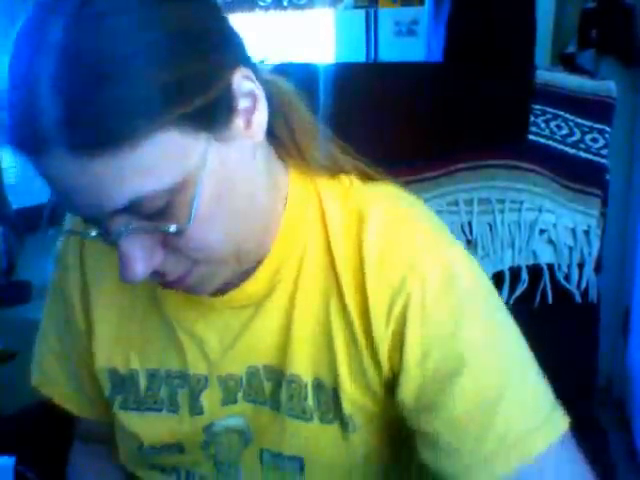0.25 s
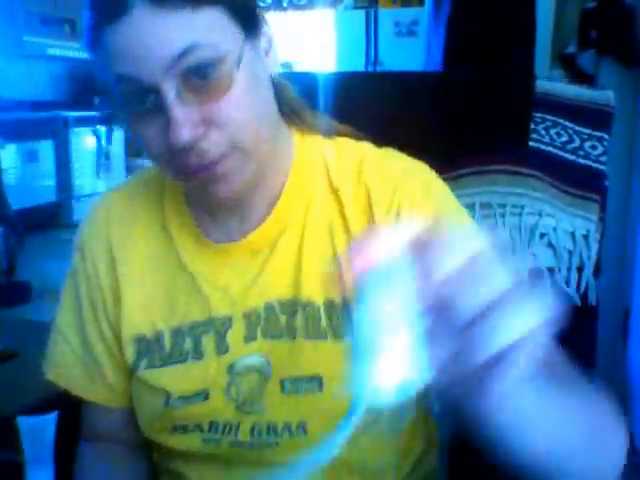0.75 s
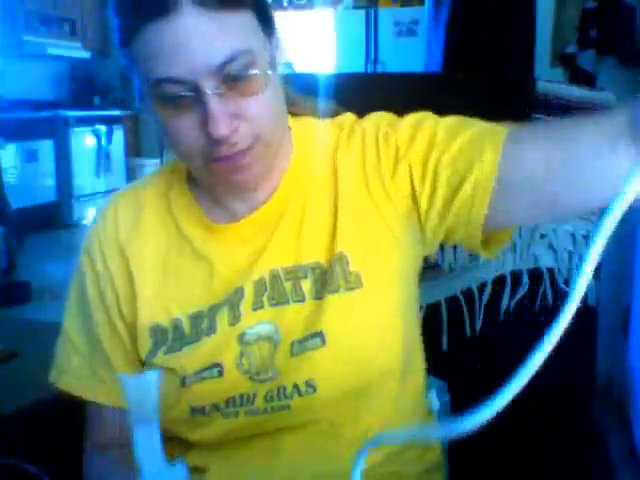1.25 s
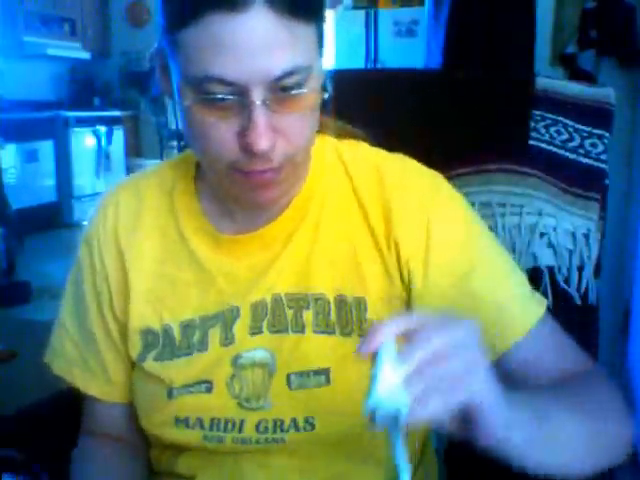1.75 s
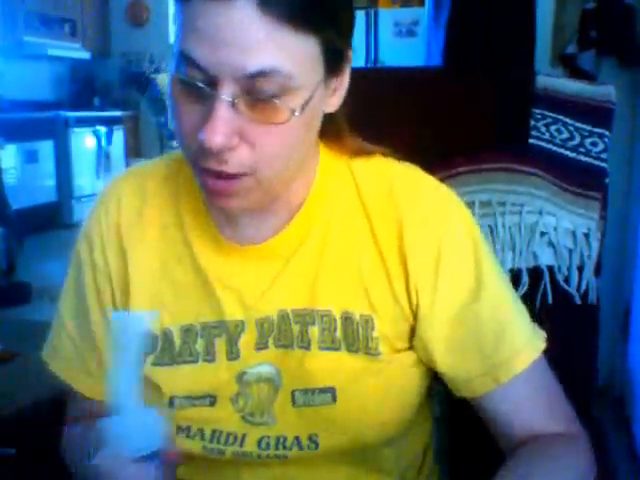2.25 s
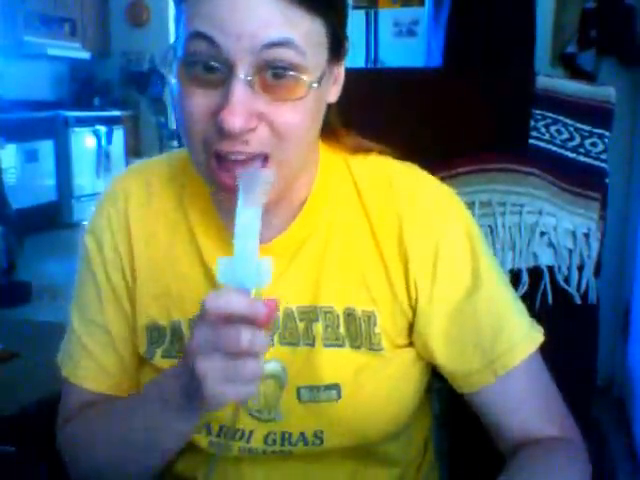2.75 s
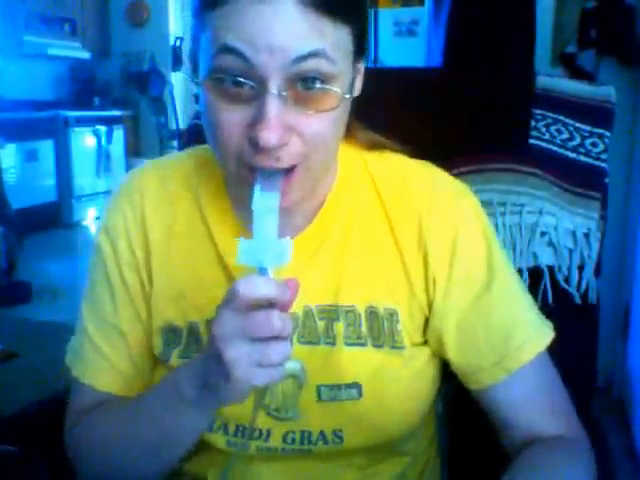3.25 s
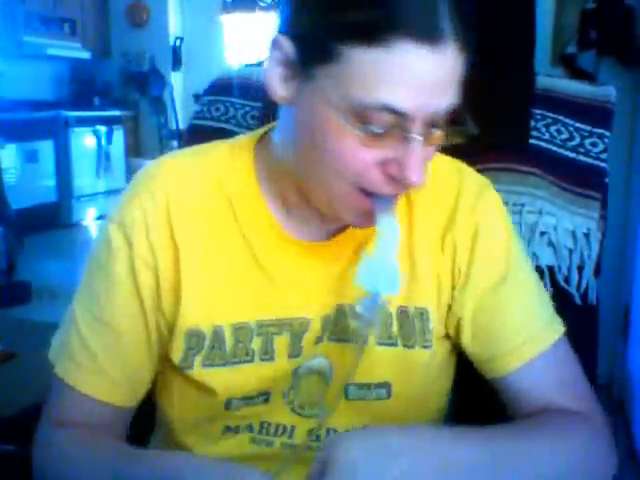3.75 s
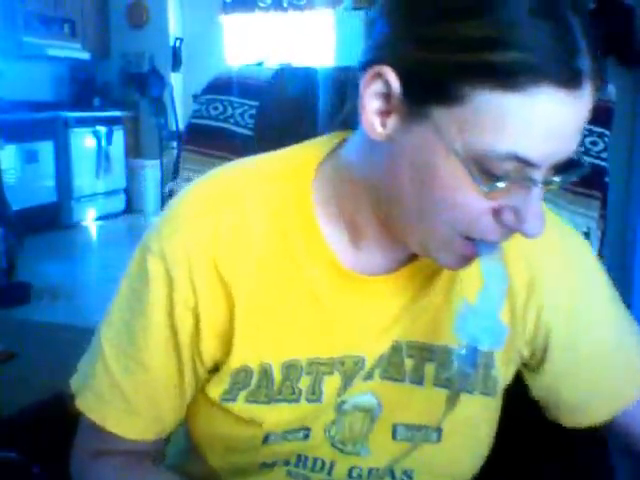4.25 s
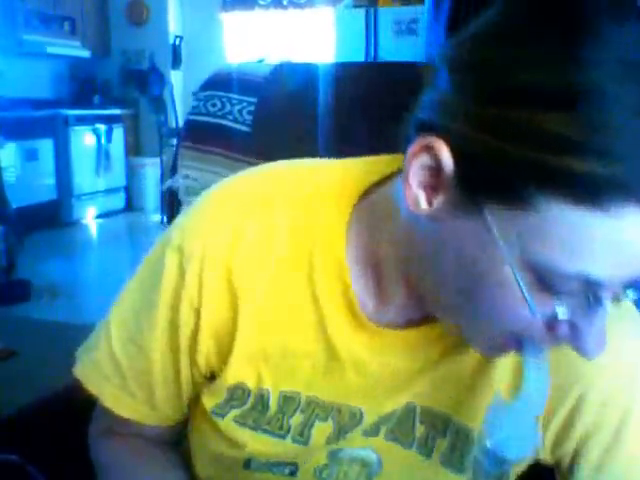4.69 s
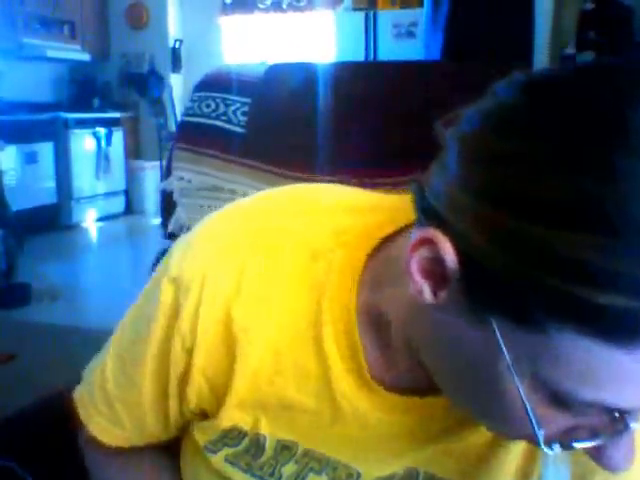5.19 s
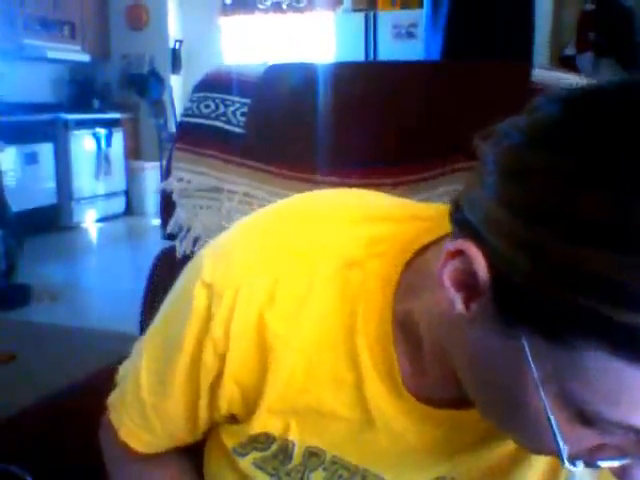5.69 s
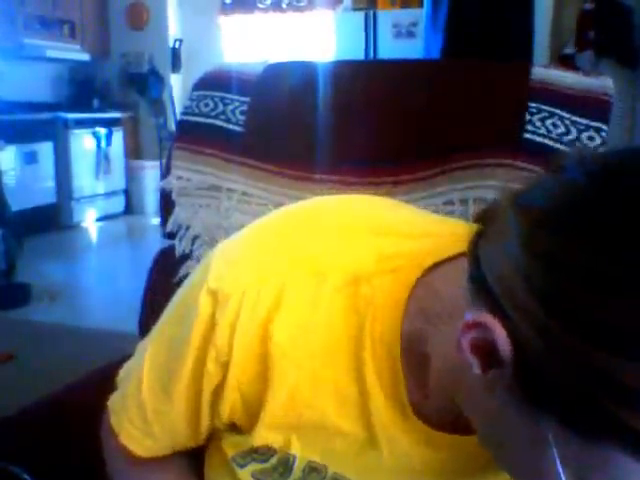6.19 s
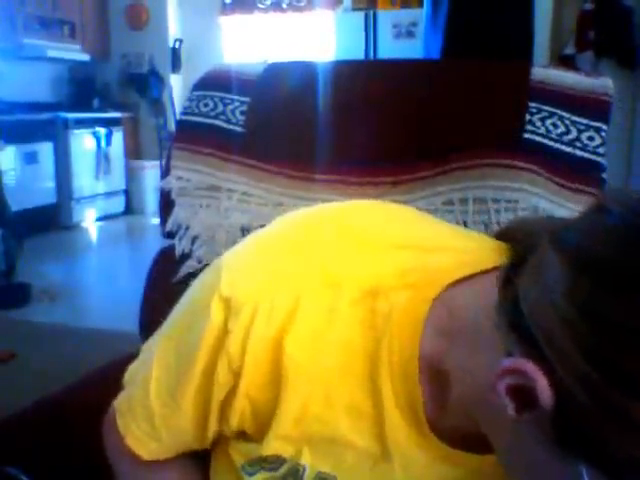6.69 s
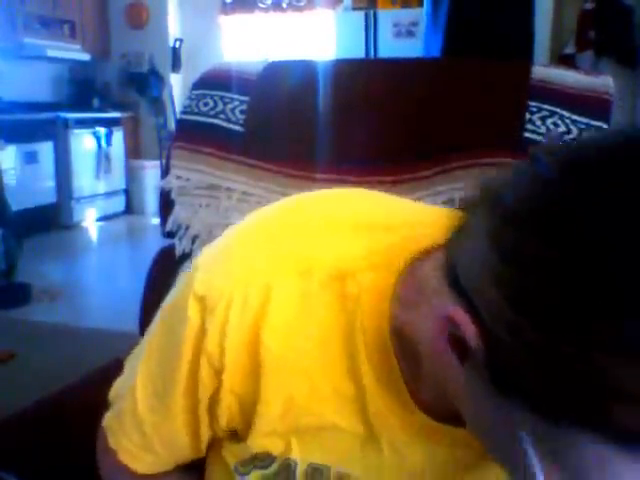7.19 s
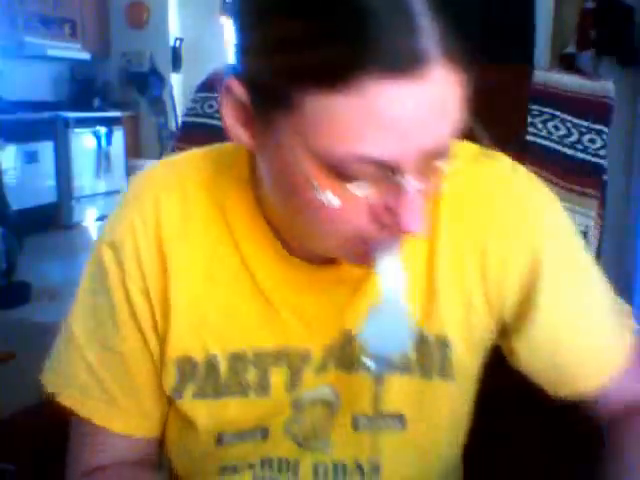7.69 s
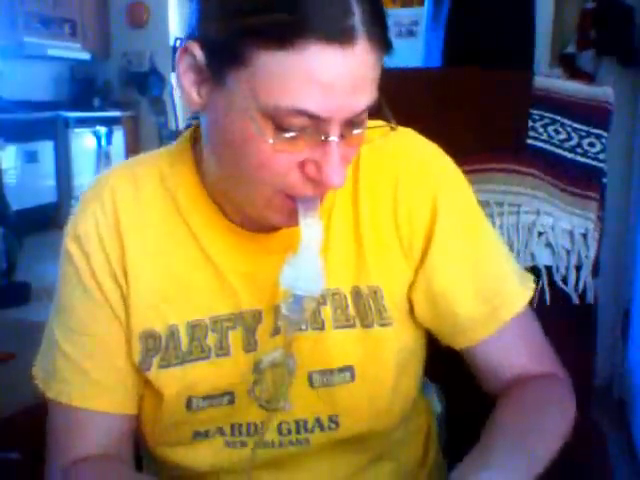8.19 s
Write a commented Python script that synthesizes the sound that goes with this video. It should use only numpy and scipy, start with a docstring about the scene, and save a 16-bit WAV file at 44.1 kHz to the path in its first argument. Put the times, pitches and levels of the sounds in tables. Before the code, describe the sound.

Close indoor handling of a plastic kit: sharp hollow rattles at first, then sparse light taps and low thumps above a constant low hum.

```python
"""Hard plastic parts clatter on the hollow case of a nebulizer kit as the tubing is pulled free.
Each contact is a few noise bursts plus the decaying rings of the case and of a loose part.
Fainter ticks, mouthpiece clicks, skidding scrapes and low bumps follow, as a power plug is fumbled.
A fan, made of a hum, filtered noise and thin tones, runs underneath and swells when the noise gate opens.
All the handling sounds in a small room, close to a cheap computer microphone that cuts the high treble."""
import sys
import numpy as np
from scipy import signal
from scipy.fft import rfft, irfft
from scipy.io import wavfile
from scipy.ndimage import uniform_filter1d

SR = 44100
rng = np.random.default_rng(int(sys.argv[2]) if len(sys.argv) > 2 else 0)


def int16_out(signal):
    """Quantize to a 16-bit WAV file."""
    q = np.round(np.clip(np.atleast_2d(signal).T, -1, 1) * 32767)
    wavfile.write(sys.argv[1], SR, q.astype(np.int16))


N = 372204  # length in samples

# Plastic clattering on the case. Each row: start in seconds, relative level in dB, bright top in dB,
# hollow low part in dB, ring of the loose part in Hz, relative level of that ring in dB.
CLATTER_HITS = [(.072, -8.5, -6.5, -5, 2290, -7.5), (0.0756, -12, -16.5, -1, 580, -3.5),
                (0.0813, -18.5, -14, 0, 2310, -7), (.088, -23, -16, 1.5, 1900, -6),
                (0.1026, -17.5, -7, 1, 2290, -1.5), (.1255, -25, -7, -1, 950, 1),
                (0.1731, -32, -15, 2, 2000, -2.5), (.2052, -26, -21.5, 6.5, 800, -9),
                (.2585, -15.5, -3, -1.5, 6150, 4), (0.2627, -24, -18, 1.5, 930, -2.5),
                (0.2985, -25.5, -15.5, 0.5, 2100, -6.5), (.6315, -9.5, -9, -2.5, 2450, -6.5),
                (.642, -13.5, -8, -5.5, 1550, -6), (.6505, -8.5, -3.5, -4.5, 5900, 2.5),
                (.6543, -15, -18, 0.5, 936, -4), (0.665, -24.5, -6, -2, 5730, -7.5),
                (.6829, -22.5, -7.5, -3, 2390, -6), (.7387, -23, -11, -2.5, 2360, -5.5),
                (0.777, -20.5, -9.5, -5, 2840, -5.5), (.7847, -22.5, -4, -2, 5285, -7.5),
                (.7915, -26.5, -9, -4, 2500, -8), (0.8007, -19.5, -7.5, -1.5, 1570, -8.5),
                (.836, -29, -15, -3.5, 2439, -6.5), (0.8812, -8.5, -5, -4.5, 2050, -9),
                (0.9035, -24, -7.5, -5, 2930, -3), (.909, -5, -7.5, -5.5, 5965, -0.5),
                (0.9116, -12, -10.5, -2, 2961, 2), (.9184, -17.5, -10, -1.5, 970, -2.5),
                (1.0035, -27, -16.5, -3, 520, -11.5), (1.0485, -16, -8, -11, 1810, -10),
                (1.1164, -29, -37.5, 1, 1890, -5.5), (1.138, -30, -29.5, -8, 1954, -7),
                (1.1838, -28, -30, 0.5, 2460, -3)]
# Ringing modes of the case and its parts. Each row: pitch in Hz, relative level in dB, 60 dB decay in seconds.
CASE_MODES = [(267, -15.5, 0.15), (361, -12, 0.16), (488.59, -8.5, 0.27), (537, -9.5, .2), (618.8, -9, 0.2),
              (716.7, -19, .22), (823.3, -18, 0.36), (921.2, -14, 0.36), (998.4, -16, 0.3),
              (1251, -20, 0.33), (1337.4, -20, .22), (1436.5, -19, 0.2), (1588, -14, 0.13),
              (1894, -15, .14), (1985, -15.5, .14), (2133, -15.5, 0.1), (2397, -14.5, .12),
              (2284, -13, 0.16), (2560, -17, 0.13), (2923.7, -13.5, 0.13), (3463, -18.5, .14)]
# Colour of a plastic crack. Each row: frequency in Hz, relative density in dB per Hz.
CRACK_COLOUR = [(120, -25), (260, -3), (370, 4.5), (530, 9), (740, -1), (950, -0.5), (1170, -8.5),
                (1550, -3), (1720, -5.5), (2270, -1.5), (2600, -7), (3200, -6), (3750, -16), (4400, -7.5),
                (5200, -10), (6000, -7.5), (7200, -16), (8600, -35)]
# Light ticks of tubing, mouthpiece and plug. Each row: start in seconds, relative level in dB, low part in dB,
# bright top in dB, lower ring in Hz, upper ring in Hz, relative level of the rings in dB.
LIGHT_TICKS = [(1.407, -31, 1.5, -4, 582, 1936, 1), (1.484, -37.5, -10.5, 1, 1283, 2380, -23),
               (1.805, -33, -5, -1.5, 1966, 2747, -2), (3.158, -54, -7, 2.5, 1543, 2108, 1),
               (3.253, -53, -9.5, -6, 2245, 6010, -10), (4.790, -35.5, 5, -28.5, 784.8, 1417, 1),
               (4.842, -50.5, 12, -29.5, 1039, 1280, 6.5), (4.885, -43, 12.5, -40, 420, 1114, 1.5),
               (4.897, -46.5, 7.5, -29, 462, 1400, 2), (4.936, -38, 0.5, -8, 1117, 1413, 0),
               (4.941, -43, 3, -19, 1453, 1853, 4.5), (5.3007, -36.5, 8.5, -15, 1307, 3370, -2),
               (5.313, -38, 2, -40, 832, 1583, -0.5), (6.0194, -37, 4, -26.5, 424, 1098, 4.5),
               (6.030, -48.5, 6, -33, 496, 1132, 6.5), (7.01, -34, 0, -34, 748.7, 1644, -3.5),
               (7.284, -34.5, 7.5, -12.5, 1262, 2575, 0.5), (7.288, -31.5, 6.5, -24.5, 516, 841, 2),
               (7.298, -41.5, 11, -45.5, 447, 990, -8.5), (7.359, -38, -4.5, -28, 920, 1145, 3.5),
               (7.384, -40.5, 8, -34, 463, 1337, 2), (7.404, -46.5, -10, -37.5, 1110, 1342, 1),
               (7.484, -32, 1, -18, 898.4, 1964, -5), (7.580, -40.5, 11.5, -40, 399, 1205, -7.5),
               (7.604, -36.5, 9, -41, 778.6, 1737, 2), (7.7093, -43, 4, -3.5, 854, 909, 14),
               (7.724, -45.5, 6.5, -33.5, 640, 951, 4), (7.779, -44, -2, -38, 1160, 1420, 6),
               (7.783, -48.5, 3, -36.5, 364, 891, 14), (8.159, -50, -17, -0.5, 2320, 3780, -1.5)]
# Colour of a tick. Each row: frequency in Hz, relative density in dB per Hz.
TICK_COLOUR = [(100, 3), (300, 10), (700, 3.5), (1400, 2), (2200, 2.5), (3200, -1.5), (4200, -12.5),
               (6300, -13.5), (8500, -25.5)]
# Soft bumps of case and furniture. Each row: start in seconds, level in dB before BUMP_DB, pitch in Hz.
SOFT_BUMPS = [(0.065, -10.5, 443), (0.072, -14.5, 317.8), (0.0733, -6, 497.5), (0.207, -23.5, 351),
              (0.262, -21.5, 321.2), (3.661, -59.5, 110), (4.797, -23, 189.7), (4.822, -32.5, 64.4),
              (4.949, -26, 79.2), (5.306, -36.5, 109.8), (6.02, -37.5, 185.4), (6.029, -27, 88),
              (7.285, -30, 476.3), (7.298, -38, 288), (7.314, -27.5, 276), (7.401, -30.5, 82.5),
              (7.606, -26, 90.4), (7.783, -28.5, 298.7), (7.805, -29, 75.7)]
# Colour of the fan's rushing air. Each row: frequency in Hz, relative density in dB per Hz.
FAN_AIR = [(20, 1), (50, 6), (90, 1), (130, 1), (180, -5.5), (235, -2.5), (300, -5), (400, -7), (600, -9.5),
           (1000, -18), (1500, -17.5), (2500, -27), (3800, -31), (6500, -38), (8500, -52)]
# Fan tones and a thin electronic whine. Each row: centre pitch in Hz, mean rms level in dB before the gate.
FAN_TONES = [(120, -63.5), (156, -70.5), (210.6, -61), (251, -63), (526, -69.5), (553.5, -72.5), (681, -73),
             (899, -75), (1021.5, -70.5), (1064, -77), (1362, -74.5), (1404, -79), (7970, -99)]
# Decay of the room's tail. Each row: frequency in Hz, 60 dB decay in seconds.
ROOM_T60 = [(200, 0.74), (900, .46), (2500, 0.32), (7000, 0.11935)]
# Colour the furnished room gives back. Each row: frequency in Hz, gain in dB.
ROOM_COLOUR = [(200, -7.5), (900, -1), (2500, -9), (6000, -9.5)]
# Noise gate. Each row: level at the microphone in dB, gain in dB.
GATE_CURVE = [(-37, -11), (-33.5, -4), (-19.5, -1.5)]
# Softer touches die away more slowly; their rise is slightly quicker. Each row: bright top in dB,
# basic rise in seconds, basic 60 dB decay in seconds.
CONTACT_TIMES = [(-38.5, 0.00081, 0.0714), (-17.5, 0.001124, 0.027)]
# Deeper bumps swing longer. Each row: pitch in Hz, 60 dB decay in seconds.
BUMP_T60 = [(65, 0.052), (110, 0.052), (400, 0.028)]
# Pulls sliding tubing and cord over the case. Each row: start in seconds, length in seconds,
# relative level in dB, bright top in dB.
PULLS = [(0.048, 0.29, -44.5, -25), (0.664, 0.0675, -34, -1), (0.768, 0.086, -41, -18.5),
         (0.903, 0.0865, -37, -6), (0.999, 0.0916, -40.5, -36), (1.375, 0.0233, -45.5, -19.5)]
# How far up the body of a contact reaches. Each row: bright top in dB, basic cutoff in Hz.
CONTACT_REACH = [(-41.5, 1850), (-18.5, 1300), (-9, 12000)]
# Mouthpiece clicks against the cup. Each row: start in seconds, relative level in dB, lower favoured pitch
# in Hz, upper favoured pitch in Hz, share of the ring time left by the grip, low edge of the snap in Hz.
MOUTHPIECE_CLICKS = [(3.019, -42, 1387, 3680, 0.885, 396.3), (3.6522, -42, 1830, 3135, 0.93, 291.9),
                     (8.083, -48.5, 1488, 2520, 0.56, 2830)]
# Mouthpiece modes. Each row: pitch in Hz, relative level in dB, 60 dB decay in seconds before the grip.
MOUTHPIECE_MODES = [(1050, -5, 0.066), (1417.4, 1.5, 0.053), (1827.3, 7.5, 0.0211), (2194, 9.5, 0.035),
                    (2500, -16.5, 0.0205), (3007, 2.5, 0.0263), (3438, -7, 0.0465), (3895, 2, 0.0216),
                    (4380, -4, 0.0263), (5680, -28.5, 0.019), (6726, -11.5, 0.0214)]
# Short scrapes of an edge, the cord or the plug. Each row: start in seconds, length in seconds,
# relative level in dB, pitch in Hz.
SHORT_SCRAPES = [(.058, .012, -41.5, 2300), (0.148, 0.013, -44.5, 2303), (0.848, .012, -47, 3000),
                 (0.934, .028, -45, 4419), (1.002, 0.019, -49, 5994), (1.035, 0.02, -41, 4915),
                 (1.076, 0.014, -50.5, 3077), (3.02, .012, -44.5, 1398), (3.125, .012, -58.5, 1627),
                 (4.238, 0.26, -69.5, 2147), (6.658, 0.0646, -71, 3000), (6.948, 0.076, -66.5, 2350),
                 (7.106, 0.0077, -64.5, 2590), (7.344, .05, -54, 1270), (7.368, .028, -57, 2002),
                 (7.404, .028, -60, 1795), (7.591, 0.024, -51, 2037), (8.112, .028, -64, 1992),
                 (8.159, 0.031, -59, 2390), (8.161, 0.057, -68.5, 3600)]
# Larger loose parts ring lower and mostly longer. Each row: pitch in Hz, 60 dB decay in seconds.
PART_T60 = [(550, 0.065), (950, 0.099), (2300, 0.03), (6000, 0.012)]

FAN_DB, HUM_HZ, HUM_DB = -50.5, 89.615, -39  # air rms level; mean pitch and rms level of the hum
PULL_ATTACK_S, PULL_RELEASE_S = 0.02, 0.09954  # time to get moving; 60 dB decay once let go
BUMP_DB = 4  # how well the furniture carries bumps to the microphone
CUTOFF_HZ = 8600  # top of the microphone's range


def from_db(db):
    """Decibels to gain."""
    return 10 ** (np.asarray(db) / 20)


def rms_one(x):
    """Scale to rms 1."""
    return x / np.sqrt(np.mean(x ** 2) + 1e-20)


def unit_energy(x):
    """Scale so that the squares sum to 1."""
    return x / np.sqrt(np.sum(x ** 2) + 1e-20)


def at_hz(points, hz):
    """Read a table on a log-frequency axis."""
    f, value = np.transpose(points)
    return np.interp(np.log(np.maximum(hz, 1)), np.log(f), value)


def read(points, x):
    """Read every column of a table at a value of its first one."""
    axis, *columns = np.transpose(points)
    return [np.interp(x, axis, column) for column in columns]


def add(track, start, sound):
    """Mix a sound into a track at a time in seconds."""
    i = max(round(start * SR), 0)
    track[i:i + len(sound)] += sound[:N - i]


def coloured(x, spectrum, size=4096):
    """Causal (minimum-phase) filter with a given spectrum, built by folding the cepstrum."""
    cepstrum = irfft(np.log(from_db(at_hz(spectrum, np.fft.rfftfreq(size, 1 / SR)))))
    cepstrum[1:size // 2] *= 2
    cepstrum[size // 2 + 1:] = 0
    response = irfft(np.exp(rfft(cepstrum)))
    return signal.fftconvolve(x, response)[:len(x)]


def evened(x):
    """Level out the broad humps of a noise, keeping its fine ripple."""
    hz = np.fft.rfftfreq(len(x), 1 / SR)
    energy = np.cumsum(np.abs(rfft(x)) ** 2)
    edges = np.geomspace(80, 12000, 26)
    density = np.diff(np.interp(edges, hz, energy)) / np.diff(edges)
    centres = np.sqrt(edges[1:] * edges[:-1])
    return coloured(x, np.transpose([centres, -10 * np.log10(density + 1e-20)]))


def band(x, low_hz, high_hz):
    """Butterworth band-pass."""
    return signal.sosfilt(signal.butter(2, [low_hz, high_hz], "band", fs=SR, output="sos"), x)


def dulled(x, hz):
    """A yielding contact loses its treble: a low-pass above some pitch."""
    return signal.sosfilt(signal.butter(4, min(hz, .45 * SR), fs=SR, output="sos"), x)


def resonance(x, hz, width_hz):
    """Two-pole resonance with gain 1 on top."""
    r = np.exp(-np.pi * width_hz / SR)
    zeros = np.array([1, 0, -1]) * (1 - r * r) / 2
    return signal.lfilter(zeros, [1, -2 * r * np.cos(2 * np.pi * hz / SR), r * r], x)


def fade(t, t60):
    """Exponential decay by 60 dB in t60 seconds."""
    return np.exp(-np.log(1000) * t / t60)


def swell(t, rise_s):
    """A contact takes a moment to build up: an exponential approach to 1."""
    return 1 - np.exp(-t / max(rise_s, 1e-5))


def ring(t, hz, t60):
    """A struck mode: a sine dying away exponentially."""
    return np.sin(2 * np.pi * hz * t) * fade(t, t60)


def drift(rate):
    """Random wander along straight lines between points of spread 1, at a rate of points per second."""
    knots = rng.standard_normal(int(rate * N / SR) + 2)
    return np.interp(np.arange(N) * rate / SR, np.arange(len(knots)), knots)


def burst(colour, low_hz, high_hz, t60, rise_s=.0001, size=4096):
    """Decaying noise for many crowded, damped modes; energy of rms 1 over a hundredth of a second."""
    t = np.arange(size) / SR
    swarm = evened(rng.choice([-1, 1], size) * fade(t, t60) * swell(t, rise_s))
    return unit_energy(band(coloured(swarm, colour), low_hz, high_hz)) * np.sqrt(SR / 100)


def slip_clicks(per_s, size_db, catch_db, catch_rate):
    """Friction catches and lets go: random clicks of either sign whose sizes drift in clumps."""
    size = size_db * np.minimum(rng.exponential(1, N), 4) + catch_db * drift(catch_rate)
    signs = rng.choice([-1, 1], N)
    return from_db(size) * signs * (rng.random(N) < per_s / SR)


def wavering_tone(hz, waver_hz, rate):
    """A sine of rms 1 whose pitch wanders."""
    return np.sqrt(2) * np.sin(2 * np.pi * np.cumsum(hz + waver_hz * drift(rate)) / SR)


def fan(waver_hz=0.1, waver_db=0.41, flutter_db=2, tone_waver_hz=0.94):
    """A nearly pure hum at the turning rate, over rushing air with a few narrow tones."""
    hum = from_db(HUM_DB + waver_db * drift(2.1)) * wavering_tone(HUM_HZ, waver_hz, 16.0)
    air = from_db(FAN_DB) * rms_one(coloured(rng.standard_normal(N), FAN_AIR))
    tones = sum(from_db(db + flutter_db * drift(4)) * wavering_tone(hz, tone_waver_hz, 2.6)
                for hz, db in FAN_TONES)
    return hum + air + tones


def slide(per_s=800, size_db=2.5, catch_db=3.0, catch_rate=110, knee_hz=2800, case_db=-12):
    """Sliding tubing slips in clumps of tiny clicks that ring the case; some pulls scrape brighter."""
    clicks = slip_clicks(per_s, size_db, catch_db, catch_rate)
    slips = rms_one(coloured(clicks, CRACK_COLOUR))
    # a mode's bandwidth follows from its decay time
    case = rms_one(sum(resonance(clicks, hz, np.log(1000) / (np.pi * t60)) * from_db(db)
                       for hz, db, t60 in CASE_MODES))
    dull = band(slips, 340, knee_hz) + from_db(case_db) * case
    bright = band(slips, knee_hz, 7700)
    out, t = np.zeros(N), np.arange(N) / SR
    for start, length, db, bright_db in PULLS:
        attack = np.clip((t - start) / PULL_ATTACK_S, 0, 1)
        motion = attack * fade(np.maximum(t - start - length, 0), PULL_RELEASE_S)
        out += from_db(db) * motion * (dull + from_db(bright_db) * bright)
    return out


def scrapes(per_s=1700, size_db=2.0, catch_db=3, catch_rate=170, breadth=1.1, ring_width_hz=100,
            ring_db=0, rise_s=.003, release_t60=.04):
    """An edge skids in uneven little slips, each ringing it briefly around one pitch."""
    out, t = np.zeros(N), np.arange(SR // 3) / SR
    clicks = slip_clicks(per_s, size_db, catch_db, catch_rate)
    for start, length, db, hz in SHORT_SCRAPES:
        motion = swell(t, rise_s) * fade(np.maximum(t - length, 0), release_t60)
        slips = np.roll(clicks, -round(start * SR))[:len(t)] * motion + 1e-18
        rub = unit_energy(band(slips, hz / breadth, hz * breadth))
        edge_ring = unit_energy(dulled(resonance(slips, hz, ring_width_hz), hz * breadth))
        skid = unit_energy(rub + from_db(ring_db) * edge_ring)
        # longer scrapes carry more energy
        add(out, start, from_db(db) * np.sqrt(length * SR) * skid)
    return out


def bumps(rise_s=0.002755, sway_db=-15, sway_hz=50, sway_t60=0.55, heavy_hz=120):
    """Heavy, soft contacts swing for a few cycles; the deepest leave the furniture swaying."""
    out, t = np.zeros(N), np.arange(SR // 3) / SR
    for start, db, hz in SOFT_BUMPS:
        swing = ring(t, hz, at_hz(BUMP_T60, hz))
        sway = from_db(sway_db) * ring(t, sway_hz * rng.uniform(.8, 1.6015), sway_t60)
        bump = swing + sway * (hz < heavy_hz)
        add(out, start, from_db(db + BUMP_DB) * bump * swell(t, rise_s))
    return out


def clatter(low_db=-10.0, mid_db=-9.5, top_db=-9, case_db=-7, low_t60=0.033, mid_t60=0.024, top_t60=.015,
            spread_db=2, rise_s=.0004):
    """Each contact cracks, rings the loose part briefly and excites every case mode with a new strength."""
    out, t = np.zeros(N), np.arange(SR // 2) / SR
    hz, mode_db, t60 = np.transpose(CASE_MODES)
    case_rings = ring(t, hz[:, None], t60[:, None])
    signs = (-1) ** np.arange(len(hz))
    for start, db, bright_db, hollow_db, part_hz, part_db in CLATTER_HITS:
        reach_hz, = read(CONTACT_REACH, bright_db)
        low = burst(CRACK_COLOUR, 370, 1400, low_t60, 2 * rise_s)
        body = dulled(burst(CRACK_COLOUR, 1150, 4500, mid_t60, rise_s), 1.263 * reach_hz)
        top = burst(CRACK_COLOUR, 3800, 8100, top_t60, rise_s)
        part = ring(t, part_hz, at_hz(PART_T60, part_hz)) * swell(t, rise_s)
        add(out, start, from_db(db + hollow_db + low_db) * low)
        add(out, start, from_db(db + mid_db) * body)
        add(out, start, from_db(db + bright_db + top_db) * top)
        add(out, start, from_db(db + part_db) * part)
        # the hollow level tilts only the lower case modes
        tilt_db = at_hz([(800, hollow_db), (1400, 0.0008)], hz)
        strength = from_db(db + case_db + mode_db + tilt_db + spread_db * rng.standard_normal(len(hz)))
        add(out, start, strength * signs @ case_rings / 2)
    # parts this small radiate no bass
    return signal.sosfilt(signal.butter(2, 160, "high", fs=SR, output="sos"), out)


def ticks(low_db=-9, mid_db=-7, top_db=-6, lower_ring_db=2, upper_ring_db=0, ring_t60=0.03603,
          rebound_db=-11, rebound_s=0.007):
    """Light touches: a snap or a scuff, two brief rings of the small part, and a weak rebound."""
    out, t = np.zeros(N), np.arange(SR // 10) / SR
    for start, db, body_db, bright_db, lower_hz, upper_hz, ring_db in LIGHT_TICKS:
        rise_s, t60 = read(CONTACT_TIMES, bright_db)
        reach_hz, = read(CONTACT_REACH, bright_db)
        # harder contacts reach further into the treble
        top_hz = np.interp(bright_db, [-30, -8], [3200, 6000])
        mid_hz = np.clip(1.014 * upper_hz, 1700, 3800)
        low = burst(TICK_COLOUR, 150, 690, t60, rise_s)
        body = dulled(burst(TICK_COLOUR, 637, mid_hz, t60, rise_s), reach_hz)
        top = burst(TICK_COLOUR, 2330, top_hz, t60, rise_s / 2)
        lower_ring = from_db(lower_ring_db) * ring(t, lower_hz, ring_t60)
        upper_ring = from_db(upper_ring_db) * ring(t, upper_hz, ring_t60)
        rebound = burst(TICK_COLOUR, lower_hz / 2, upper_hz, t60 / 2)
        add(out, start, from_db(db + body_db + low_db) * low)
        add(out, start, from_db(db + mid_db) * body)
        add(out, start, from_db(db + bright_db + top_db) * top)
        add(out, start, from_db(db + ring_db) * (lower_ring + upper_ring) * swell(t, rise_s))
        rebound_start = start + rebound_s * rng.uniform(0.3714, 1.3)
        add(out, rebound_start, from_db(db + mid_db + rebound_db) * rebound)
    return out


def mouthpiece(favour_db=9, favour_octaves=0.21, spread_db=-1.0, rise_s=0.00026, snap_db=0,
               snap_t60=0.02084):
    """One sharp snap rings the hollow mouthpiece, with a boost for modes near two favoured pitches."""
    out, t = np.zeros(N), np.arange(SR // 8) / SR
    hz, mode_db, t60 = np.transpose(MOUTHPIECE_MODES)
    for start, db, lower_hz, upper_hz, ring_share, edge_hz in MOUTHPIECE_CLICKS:
        snap = burst(TICK_COLOUR, edge_hz, 5400, snap_t60, rise_s)
        add(out, start, from_db(db + snap_db) * snap)
        favoured = sum(np.exp(-(np.log2(hz / f) / favour_octaves) ** 2) for f in (lower_hz, upper_hz))
        chance_db = spread_db * rng.standard_normal(len(hz))
        strength = from_db(db + mode_db + favour_db * favoured + chance_db)
        rings = ring(t, hz[:, None], ring_share * t60[:, None])
        add(out, start, (strength * rng.choice([-1, 1], len(hz))) @ rings * swell(t, rise_s))
    return out


def room(x, early_db=-10, early_t60=0.15, tail_db=-15, gap_s=0.0023):
    """Early reflections and a diffuse tail, both decaying noise; the tail's treble dies sooner."""
    t = np.arange(SR * 3 // 4) / SR
    edges = np.geomspace(100, 12800, 8)
    tail = sum(band(rng.standard_normal(len(t)), low, high) * fade(t, at_hz(ROOM_T60, np.sqrt(low * high)))
               for low, high in zip(edges, edges[1:]))
    early_noise = rng.standard_normal(len(t)) * fade(t, early_t60) * (t > gap_s)
    early = band(evened(early_noise), edges[0], edges[-1])
    response = from_db(early_db) * unit_energy(early) + from_db(tail_db) * unit_energy(tail * (t > gap_s))
    return signal.fftconvolve(x, coloured(response, ROOM_COLOUR))[:N]


def gate(x, size=1200):
    """Noise gate: the gain follows the smoothed level and drops most near the background."""
    level_db = 10 * np.log10(np.maximum(uniform_filter1d(x ** 2, size), 1e-12))
    gain_db = np.interp(level_db, *np.transpose(GATE_CURVE))
    return x * from_db(uniform_filter1d(gain_db, size // 2))


def scene(tick_room_db=-8, bump_room_db=-5):
    """Handling noises in the room, over the fan; light and heavy touches excite the room less."""
    loud = clatter() + slide()
    light = ticks() + mouthpiece() + scrapes()
    heavy = bumps()
    reflected = room(loud + from_db(tick_room_db) * light + from_db(bump_room_db) * heavy)
    return (loud + light + heavy + reflected + fan())[None]


def record(dry, top=0.928):
    """The microphone gates the quiet stretches, rounds the highest peaks and passes no high treble."""
    rounded = top * np.tanh(gate(dry) / top)
    return signal.sosfilt(signal.ellip(10, .3, 70, CUTOFF_HZ, fs=SR, output="sos"), rounded)


dry = scene()
out = record(dry)
int16_out(out)
```